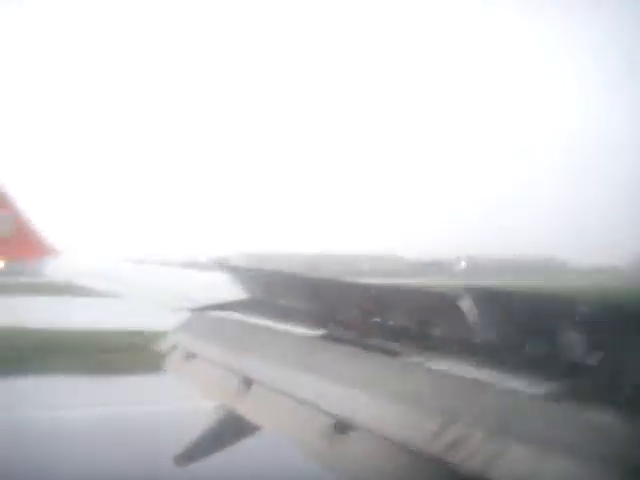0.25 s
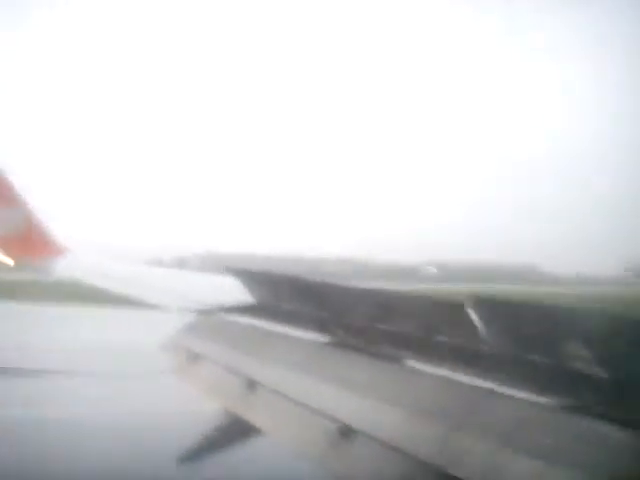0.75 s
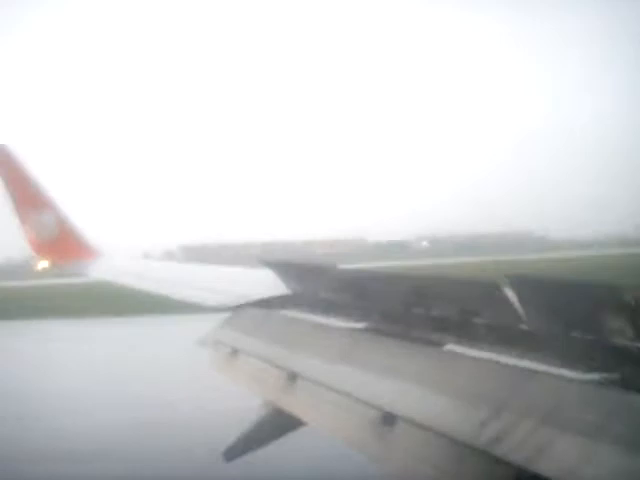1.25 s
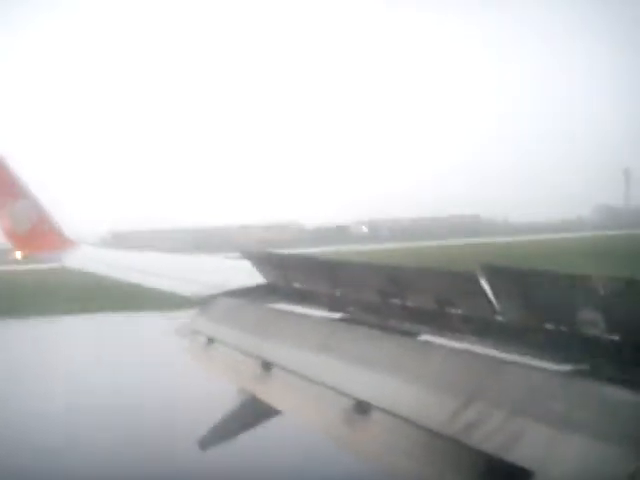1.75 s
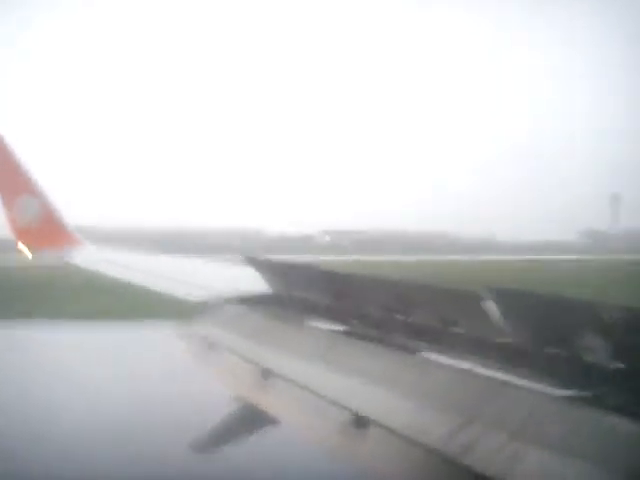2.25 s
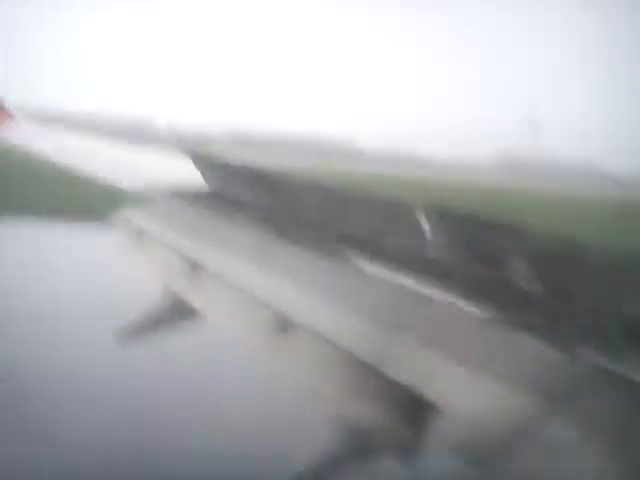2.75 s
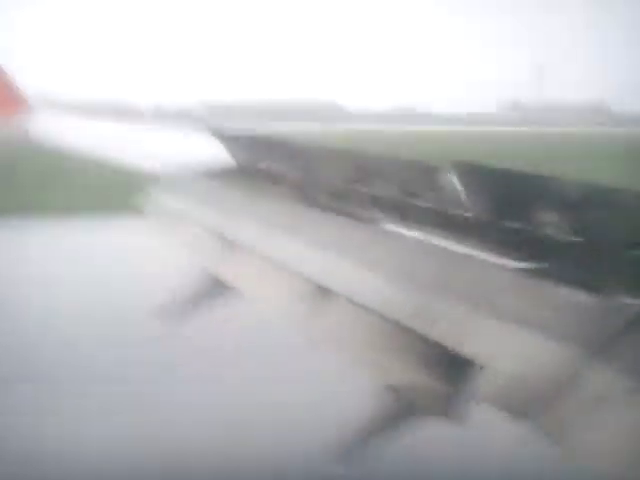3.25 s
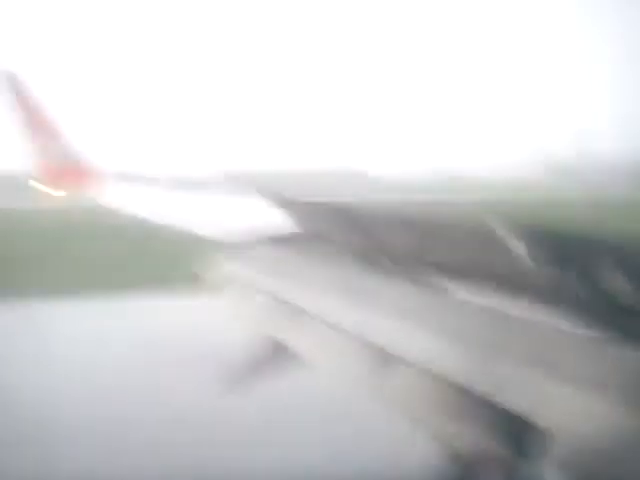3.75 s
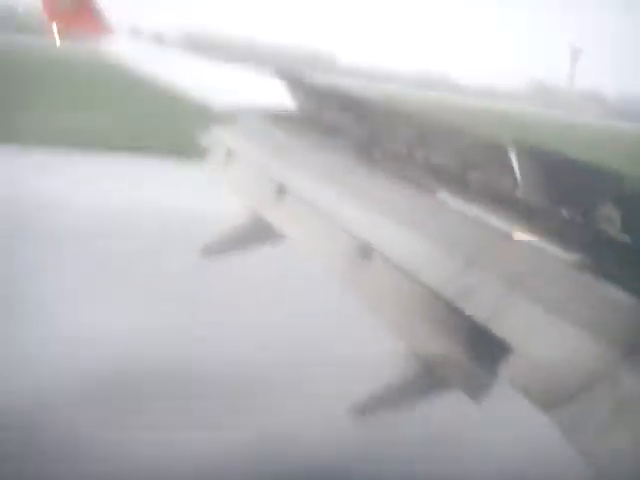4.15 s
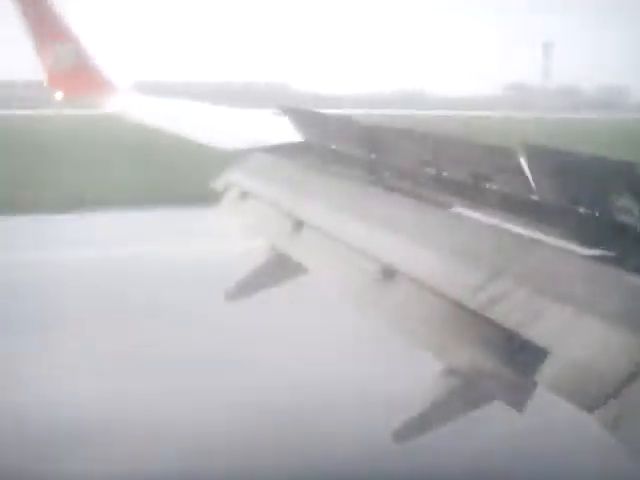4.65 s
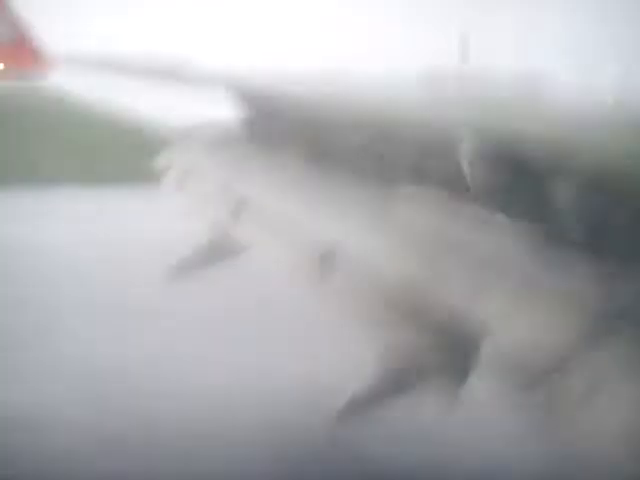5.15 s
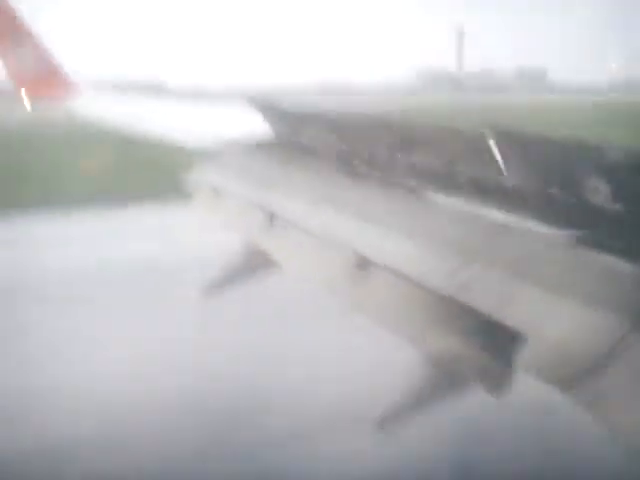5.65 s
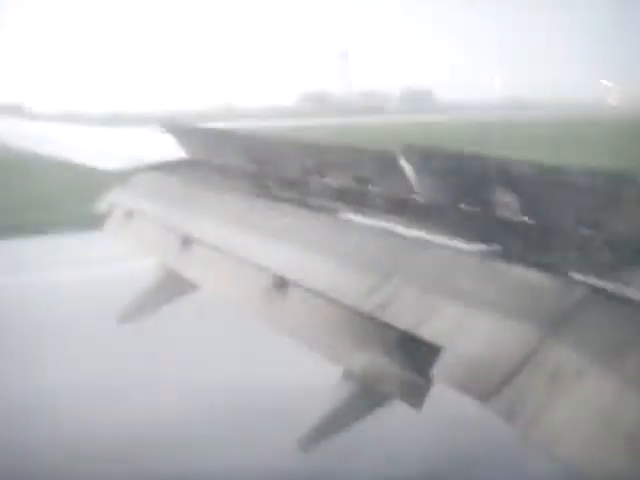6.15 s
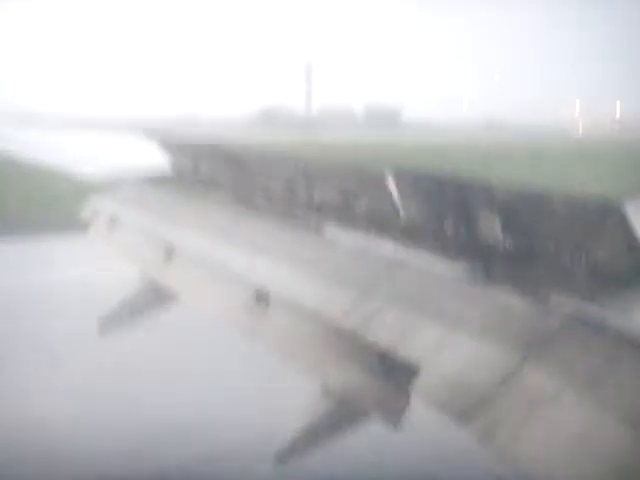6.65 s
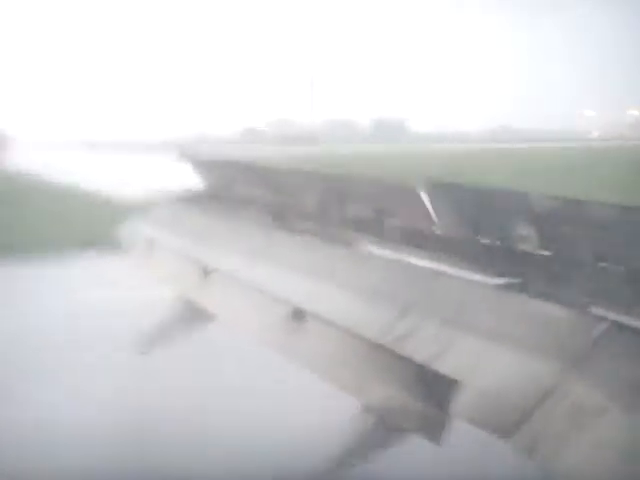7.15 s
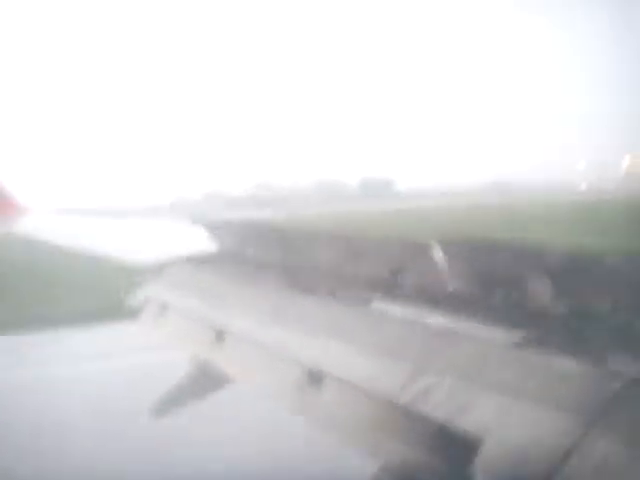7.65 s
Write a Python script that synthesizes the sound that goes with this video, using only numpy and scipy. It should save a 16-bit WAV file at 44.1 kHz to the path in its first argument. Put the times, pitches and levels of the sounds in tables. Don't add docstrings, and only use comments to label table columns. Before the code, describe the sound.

Inside an airliner cabin rolling along a wet runway after touchdown. From 0 seconds a deep, uneven wheel rumble drums through the floor over a muffled engine roar, while loose trim rattles in a rapid cluster up to about 0.9 seconds. Around 1.1 seconds a short burst of spray hisses as tyres hit standing water. Sharper knocks come near 1.5 and 2.15 seconds as the engines start to swell. By about 3 seconds reverse thrust is a full, low, turbulent roar; panels buzz and shudder in waves, and spray hisses ever more thickly on the skin, settling after about 3.4 seconds. From about 2.9 seconds to the end near 7.9, the roar stays loud and overloads the small microphone: peaks flatten into gritty distortion, and tiny dropouts briefly dull the treble, giving a rough, fluttering, choking texture. It stops still roaring.

```python
import sys
import numpy as np
from scipy import signal
from scipy.fft import rfft, irfft, next_fast_len
from scipy.io import wavfile
from scipy.ndimage import uniform_filter1d, map_coordinates

SR = 44100
rng = np.random.default_rng(int(sys.argv[2]) if len(sys.argv) > 2 else 0)


def wav_out(sig):
    wavfile.write(sys.argv[1], SR, np.round(np.clip(np.atleast_2d(sig).T, -1, 1) * 32767).astype(np.int16))


def elevation(decibels):
    levels = np.asarray(decibels, float)
    return 10 ** (levels / 20)


N = 348831
TIME_S = np.arange(N) / SR


def unit(x):
    return x / np.sqrt(np.mean(x ** 2) + 1e-20)


def along(points, hz):
    f, v = np.transpose(points)
    return np.interp(np.log(hz + 1), np.log(f + 1), v)


def wobble(rate):
    knots = rng.standard_normal(int(N * rate / SR) + 4)
    return map_coordinates(knots, [np.arange(N) * rate / SR])


def filtered(x, response):
    edge = 4096
    m = next_fast_len(N + 2 * edge)
    ends = [(0, 0)] * (x.ndim - 1) + [(edge, m - N - edge)]
    spectrum = rfft(np.pad(x, ends, mode="reflect"))
    y = irfft(spectrum * response(np.fft.rfftfreq(m, 1 / SR)), m)
    return y[..., edge:edge + N]


def rush(spectrum, patchy_db):
    z = signal.stft(rng.standard_normal(N), nperseg=512)[2]
    field = uniform_filter1d(rng.standard_normal(z.shape), size=7, axis=0)
    field = uniform_filter1d(field, size=6, axis=1)
    noise = signal.istft(z * elevation(patchy_db * unit(field)), nperseg=512)[1][:N]
    return unit(filtered(noise, lambda hz: elevation(along(spectrum, hz))))


# time in seconds, jet roar in dB, shudder of the skin in dB.
THRUST = [(0, -22, 1), (.65, -19, 2.5), (1.05, -20.5, -0.5), (1.4, -17.5, 1.5), (1.85, -17, -0.5),
          (2.1, -14.5, -1), (2.3, -13.5, -0.5), (2.8, -10, 1.5), (3.05, -8.5, -1.5), (3.45, -8.5, 2),
          (3.85, -9.5, -1), (4.2, -9, 2), (4.6, -8, -0.5), (5.45, -9, 1.6), (5.9, -8, 0.95), (6.9, -9.5, 1),
          (7.3, -9, -0.1), (7.91, -8, 2)]


def thrust():
    s, roar, shudder = np.transpose(THRUST)
    jet_db = np.interp(TIME_S, s, roar)
    shudder_db = np.interp(TIME_S, s, shudder)
    shake_db = 0.81 * wobble(20) + 1.87 * wobble(60) + 1.3 * shudder_db
    return jet_db, shake_db


# frequency in Hz, density in dB per Hz.
JET = [(40, -26.5), (90, -1), (150, -2), (206, 1), (265, -4.5), (325, -2), (378, -9.5), (430, -9.5),
       (520, -23), (1000, -52.5)]


def reversed_jets(jet_db):
    roar_over_db = 2.5
    return elevation(jet_db + roar_over_db + 0.72 * wobble(20)) * rush(JET, patchy_db=1.23)


# frequency in Hz, density in dB per Hz.
FLOOR = [(8, -22), (15, -5.5), (27, -5), (36, -6.5), (50, 1.5), (70, -7), (110, -12.5), (200, -26.5),
         (500, -70.5)]


def wheels():
    wheels_db, seams_db, seams_per_s = -13, 1.5, 9
    return elevation(wheels_db + seams_db * wobble(seams_per_s)) * rush(FLOOR, patchy_db=0.57)


FULL_THRUST_DB = -9.5
# frequency in Hz, density in dB per Hz.
TRIM = [(250, -30.5), (480, -6), (540, -4), (615, 0.5), (700, -2), (870, -3), (960, -6), (1150, -8.5),
        (1510, -13), (2300, -18), (3300, -19.5), (4500, -29.5), (7000, -21.5)]


def trim_buzz(jet_db, shake_db):
    full_db, db_per_thrust_db = -21.5, 0.68
    buzz_db = full_db + db_per_thrust_db * (jet_db - FULL_THRUST_DB) + 0.63 * shake_db
    return elevation(buzz_db) * rush(TRIM, patchy_db=0.83)


# start in seconds, peak level in dB.
RATTLES = [(0.0727, -21.5), (0.104, -21.5), (0.155, -21), (0.1937, -25.5), (0.4165, -33), (0.4722, -24.5),
           (0.4994, -27.5), (0.579, -26.5), (0.7187, -25.5), (0.853, -30.5), (1.2015, -29), (1.3707, -28.5),
           (1.4227, -30.5), (1.491, -18), (1.5373, -25.5), (1.5852, -25), (1.676, -28.5), (2.065, -31.5),
           (2.1096, -27.5), (2.145, -18), (2.1994, -20.5)]


def bumps():
    t60_s, rise_s, knock_db = 0.1, 0.0034, -2
    shaken_hiss_db, wetter_db_per_s = -15.5, 2.4
    t = np.arange(SR // 10) / SR
    knock = elevation(knock_db - 60 * t / t60_s) * (1 - np.exp(-t / rise_s))
    trim, water = np.zeros((2, N + SR))
    for s, db in RATTLES:
        start = round(s * SR)
        span = slice(start, start + len(t))
        trim[span] += elevation(db) * knock
        water[span] += elevation(db + shaken_hiss_db + wetter_db_per_s * s) * knock
    return trim[:N], water[:N]


def trim_rattle(knocks):
    bright = [(hz, db + 7.4 * np.log2(hz / 600)) for hz, db in TRIM]
    return knocks * rush(bright, patchy_db=1.5)


# frequency in Hz, density in dB per Hz.
SPRAY = [(2000, -32.5), (3600, -5.5), (4300, 0.5), (4820, 3.5), (5300, 0), (5800, -4), (6500, -11)]


def spray_hiss(jet_db, shake_db, water_knocks):
    full_db, db_per_thrust_db = -30.5, 0.34
    dry_loss_db, soaked_s, cloud_curve = -11, 3.4, 1.1
    puddle_s, puddle_db, puddle_width_s = 1.1, 2.5, 0.19
    dryness = np.clip(1 - TIME_S / soaked_s, 0, 1) ** cloud_curve
    burst_db = puddle_db * np.exp(-((TIME_S - puddle_s) / puddle_width_s) ** 2)
    hiss_db = full_db + db_per_thrust_db * (jet_db - FULL_THRUST_DB) + 0.97 * shake_db
    hiss_db += dry_loss_db * dryness + burst_db
    return (elevation(hiss_db) + water_knocks) * rush(SPRAY, patchy_db=0.46)


def scene():
    jet_db, shake_db = thrust()
    trim_knocks, water_knocks = bumps()
    mix = reversed_jets(jet_db) + wheels()
    mix += trim_buzz(jet_db, shake_db) + trim_rattle(trim_knocks)
    mix += spray_hiss(jet_db, shake_db, water_knocks)
    return mix[None]


# time in seconds, treble loss in dB, length in seconds.
CHOKES = [(2.863, -14.5, 0.0075), (2.879, -10, 0.007), (3.083, -9, 0.008), (3.142, -11, 0.008),
          (3.431, -19.5, 0.0081), (4.02, -11, 0.0082), (4.042, -8, 0.009), (4.439, -8, 0.0082),
          (4.563, -8.5, 0.0087), (4.593, -11, 0.01), (4.776, -11, 0.0066), (4.824, -7, 0.012),
          (4.987, -8.5, 0.011), (5.015, -16.5, 0.017), (5.122, -9, 0.019), (5.298, -17.5, 0.01),
          (5.467, -10, 0.014), (5.595, -3, 0.017), (5.752, -10, 0.007), (5.855, -12, 0.012),
          (5.884, -11, 0.013), (6.277, -25, 0.01), (6.4, -19.5, 0.02), (6.787, -11, 0.0094),
          (6.887, -9.5, 0.0086), (6.962, -8.5, 0.012), (7.235, -8, 0.019), (7.351, -5, 0.031),
          (7.73, -9.5, 0.011), (7.765, -10, 0.0082)]


def choked(x):
    small_jolts, from_s, small_loss_db, small_length_s = 10, 3.0, -5, 0.006
    when, size = rng.random((small_jolts, 2)).T
    times = from_s + when * (N / SR - from_s)
    small = zip(times, small_loss_db * (0.5 + size), small_length_s * (0.5 + size))
    loss_db = np.zeros(N)
    for s, db, length in [*CHOKES, *small]:
        near = slice(round((s - 0.05) * SR), round((s + 0.05) * SR))
        loss_db[near] += 1.2 * db * np.exp(-np.abs((TIME_S[near] - s) / (0.5 * length)) ** 4)
    deep = filtered(x, lambda hz: 1 / (1 + (hz / 330) ** 4))
    return deep + (x - deep) * elevation(loss_db)


def ridden(x):
    above_db, share, reaction_s = -7.5, 0.44, 0.08
    power = uniform_filter1d(x ** 2, size=round(reaction_s * SR))
    level_db = 10 * np.log10(np.abs(power) + 1e-9)
    return x * elevation(-share * np.maximum(level_db - above_db, 0))


def rounded(x, top, hardness):
    return x / (1 + np.abs(x / top) ** hardness) ** (1 / hardness)


# frequency in Hz, gain in dB.
SPLATTER = [(6200, 0), (6300, -16.5), (8000, -9.5), (10300, -0.5), (12000, -13), (16000, -11.5)]


def rate_changed(x):
    x = filtered(x, lambda hz: elevation(along(SPLATTER, hz)))
    return np.clip(x, -0.704, 0.704)


def roll_off(x):
    return signal.sosfilt(signal.butter(12, 15830, fs=SR, output="sos"), x)


def record(dry):
    x = ridden(choked(dry))
    x = rounded(x, top=1.35, hardness=3.63)
    x = filtered(x, lambda hz: hz < 6260)
    x = rounded(x, top=0.708, hardness=36)
    return roll_off(rate_changed(x))


dry = scene()
out = record(dry)
wav_out(out)
```